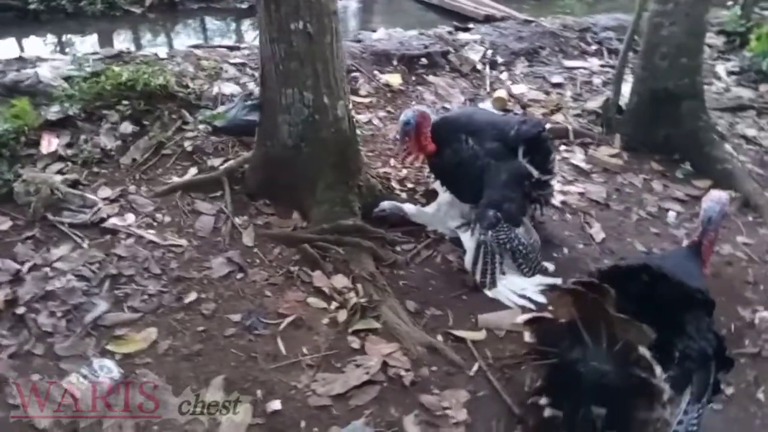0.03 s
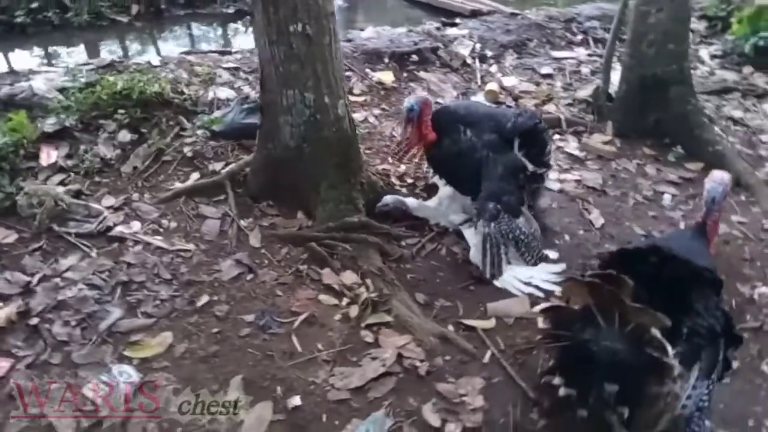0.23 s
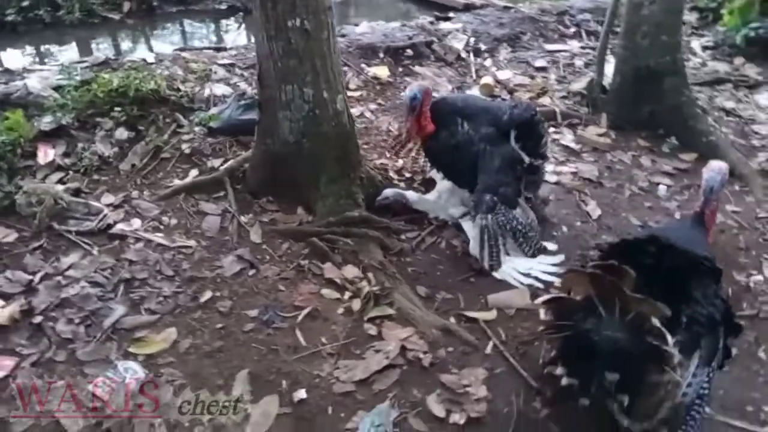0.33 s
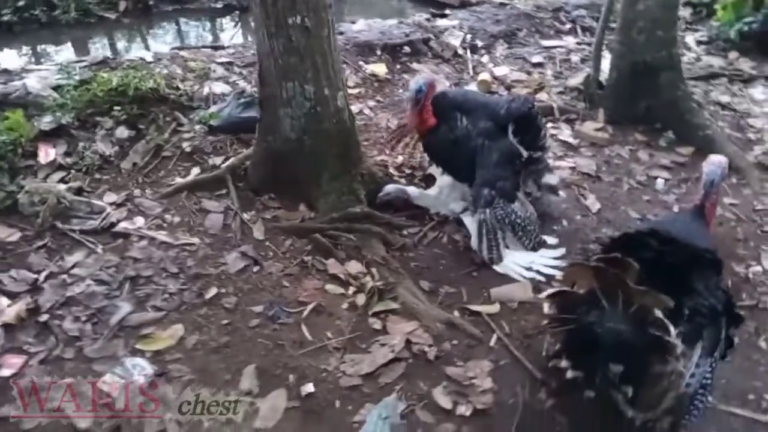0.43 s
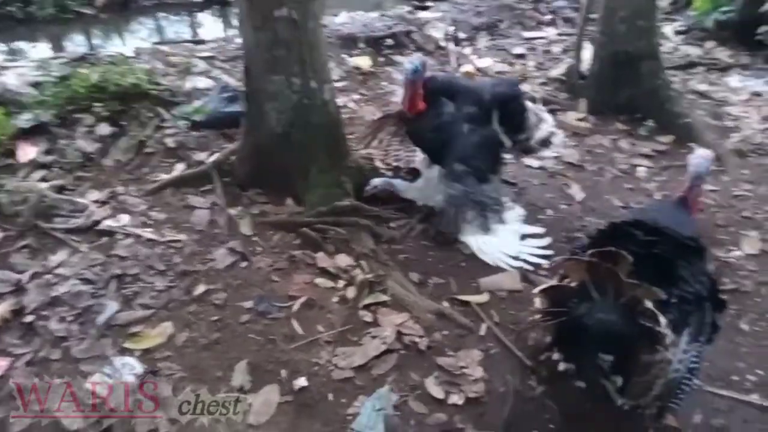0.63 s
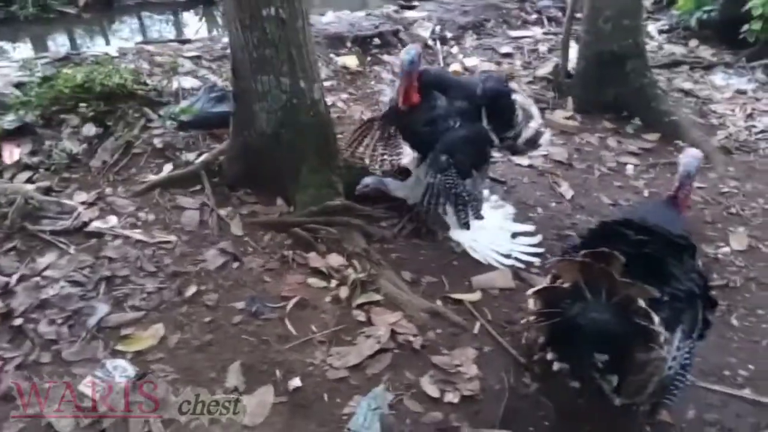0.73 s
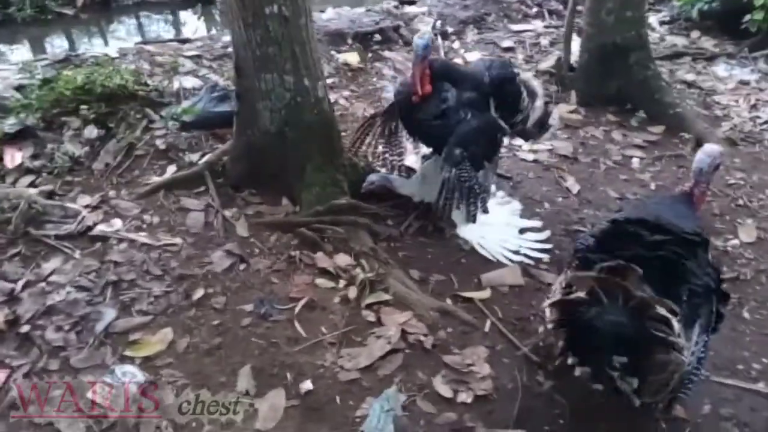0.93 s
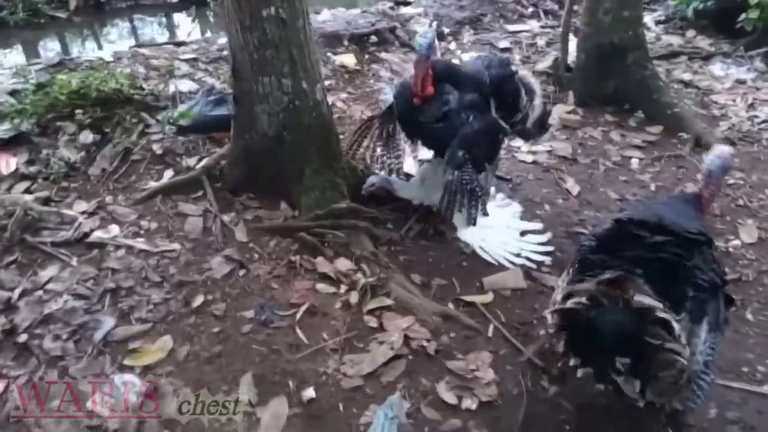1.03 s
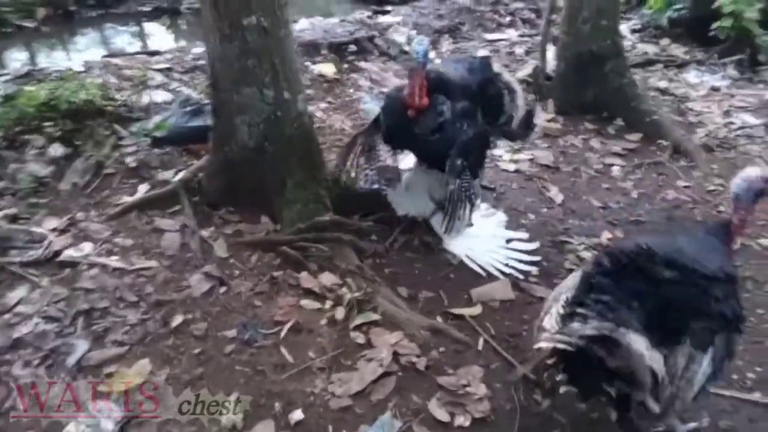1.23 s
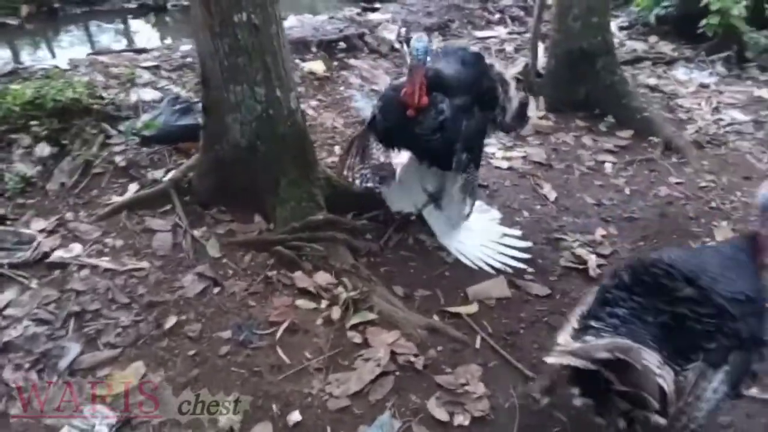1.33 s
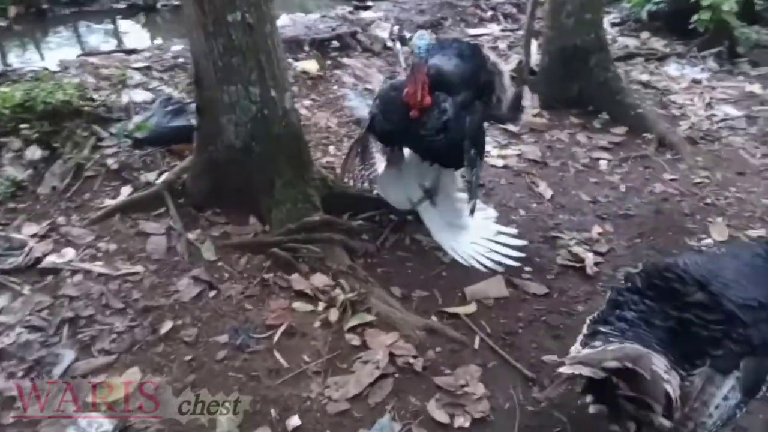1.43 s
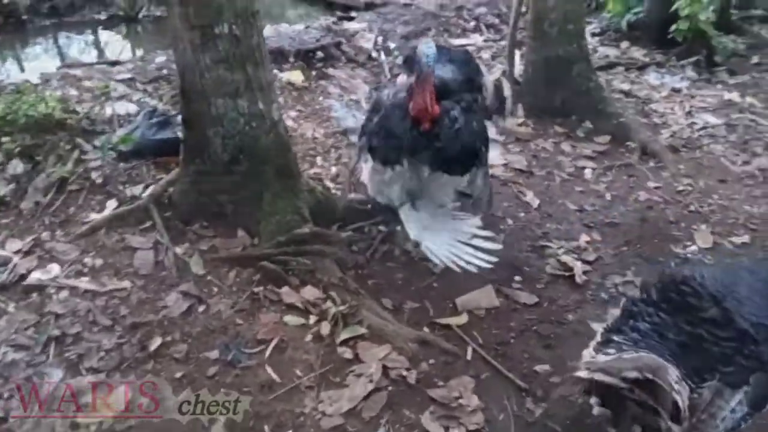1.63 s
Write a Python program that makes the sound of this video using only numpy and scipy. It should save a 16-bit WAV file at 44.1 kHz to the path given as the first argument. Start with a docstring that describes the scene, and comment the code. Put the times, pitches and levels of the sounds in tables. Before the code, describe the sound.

A turkey yelps three times, each a high thin whistle cracking down into a loud chirp outdoors

```python
"""A turkey yelps three times among trees: a sine whistle holds high, then drops into a loud chirp.
In the first two yelps it first shoots up. Overtones and air noise pass through throat resonances.
The other side of the syrinx adds a lower, rough tone, and the two combine into sum and difference tones.
Decaying noise gives the echoes. Wavering sines make far birds and coos; filtered noise, leaves and hiss."""
import sys
import numpy as np
from scipy import signal
from scipy.fft import rfft, irfft
from scipy.io import wavfile

SR = 44100
rng = np.random.default_rng(int(sys.argv[2]) if len(sys.argv) > 2 else 0)


def decibels_to_gain(level_db):
    """Convert a level in decibels to a linear amplitude gain (20 dB per decade)."""
    exponent = np.asarray(level_db, float) / 20
    return 10 ** exponent


def generate_wav(signal):
    """Clip the signal to [-1, 1] and save it as 16-bit WAV at the path in sys.argv[1]."""
    frames = np.transpose(np.atleast_2d(signal))
    scaled = np.clip(frames, -1, 1) * 32767
    pcm = np.round(scaled).astype(np.int16)
    wavfile.write(sys.argv[1], SR, pcm)


N = 74970  # samples


def rms_one(x):
    """Normalisation: scale a signal to unit rms."""
    return x / np.sqrt(np.mean(x ** 2) + 1e-20)


def at_hz(points, hz):
    """Spectral envelope: interpolate levels on a log-frequency axis."""
    point_hz, point_db = np.transpose(points)
    return np.interp(np.log(np.maximum(hz, 1)), np.log(point_hz), point_db)


def drift(rate_hz):
    """Random modulation: two-pole low-passed noise of unit rms."""
    r = np.exp(-2 * np.pi * rate_hz / SR)
    noise = rng.standard_normal(N + SR)
    return rms_one(signal.lfilter([1], [1, -2 * r, r * r], noise)[SR:])  # first second lets it settle


def coloured(spectrum):
    """Spectral shaping: white noise weighted in frequency, unit rms."""
    weights = decibels_to_gain(at_hz(spectrum, np.arange(N // 2 + 1) * SR / N))
    return rms_one(irfft(rfft(rng.standard_normal(N)) * weights, N))


def hump(start, length):
    """Amplitude envelope: half a sine cycle, zero outside it."""
    return np.sin(np.pi * np.clip((np.arange(N) / SR - start) / length, 0, 1))


def low_pass(x, hz, order):
    """Maximally flat (Butterworth) low-pass filtering."""
    return signal.sosfilt(signal.butter(order, hz, fs=SR, output="sos"), x)


def band_pass(x, band_hz, order):
    """Maximally flat (Butterworth) band-pass filtering."""
    return signal.sosfilt(signal.butter(order, band_hz, "band", fs=SR, output="sos"), x)


# Spectrum of the background hiss: [f/Hz, relative level per Hz/dB]
HISS_SPECTRUM = [(25, -25.5), (45, -18.5), (68, -4.5), (125, -6), (190, -10.5), (400, -12), (700, -18.5),
                 (1800, -15.5), (2600, -9.5), (4000, -18.5), (7200, -6), (7800, -11.5), (8800, -26.5),
                 (10000, -10), (12300, -36.5), (15200, -29.5), (16000, -41)]


def hiss():
    """Stationary noise: a steady shaped spectrum whose bass alone fluctuates strongly, in lumps."""
    level_db = -65.5  # rms before the fluctuations
    noise = coloured(HISS_SPECTRUM)
    bass = low_pass(noise, 110, order=2)
    steady = (noise - bass) * decibels_to_gain(.7 * drift(5))
    lumpy = bass * decibels_to_gain(4.5 * drift(6))
    return decibels_to_gain(level_db) * (steady + lumpy)


# Far birds and low coos: [start t/s, length/s, f/Hz, level at the peak before blurring/dB]
FAR_CALLS = [(0.02, .15, 880, -76), (.51, .1, 4220, -62), (.82, .23, 4230, -70), (.87, .16, 880, -74),
             (.96, .2, 720, -75), (1.3, .32, 900, -78), (1.587, .022, 1660, -62), (1.67, .06, 1100, -69),
             (.84, .28, 250, -78), (1.265, .045, 420, -72)]


def far_birds():
    """Frequency modulation: faint wavering sines, their amplitude blurred by distance."""
    blur = 1 + .5 * drift(40)
    waver_hz = 18 * drift(42)
    calls = 0
    for start, length, hz, db in FAR_CALLS:
        tone = np.sin(2 * np.pi * np.cumsum(hz + waver_hz) / SR)
        calls = calls + decibels_to_gain(db) * np.sqrt(2 * hump(start, length)) * tone
    return calls * blur


def track(rows):
    """Glide: pitch interpolated geometrically and sine amplitude in dB, silent outside the table."""
    s, hz, db = np.transpose(rows)
    t = np.arange(N) / SR
    edge = np.clip(np.minimum(t - s[0], s[-1] - t) / .003, 0, 1)  # 3 ms fades
    return np.exp(np.interp(t, s, np.log(hz))), decibels_to_gain(np.interp(t, s, db)) * edge * np.sqrt(2)


def resonate(x, throat):
    """Parallel resonance: alternating signs leave dark gaps between steep, twice-applied peaks."""
    out = 0
    for k, (hz, width_hz, db) in enumerate(throat):
        r = np.exp(-np.pi * width_hz / SR)
        section = [(1 - r * r) / 2, 0, (r * r - 1) / 2, 1, -2 * r * np.cos(2 * np.pi * hz / SR), r * r]
        out = out + (-1) ** k * decibels_to_gain(db) * signal.sosfilt([section, section], x)
    return out


def whistle_source(rows):
    """Harmonic series: a whistle whose overtones strengthen with effort; returns sound, phase, gain."""
    hz, gain = track(rows)
    # cycles grow uneven as the drop falls below 2600 Hz, fully so below 1300 Hz
    rasp = np.clip(2 - 2 * hz / 2600, 0, 1)
    hz = hz * (1 + .0025 * drift(42) + .07 * rasp * drift(600))
    phase = 2 * np.pi * np.cumsum(hz) / SR
    effort_db = 20 * np.log10(gain + 1e-9) + 25  # amplitude above -25 dB
    gain = gain * decibels_to_gain(1.3 * drift(120))
    gain = gain * decibels_to_gain(3.5 * rasp * drift(160))
    # the first whistle throbs as it sags
    start, length, throb_hz, depth = 0.28, 0.12, 108, .9
    throb = np.sin(np.pi * throb_hz * (np.arange(N) / SR - start)) ** 2
    gain = gain * (1 - depth * np.sqrt(hump(start, length)) * throb)
    overtones = 0
    for k in range(2, 16):
        fall = decibels_to_gain(-11 * np.log2(k / 2))  # -11 dB per doubling of the multiple
        overtones = overtones + np.sin(k * phase + k * k) * fall * (k * hz < .45 * SR)
    rich_db = -9 - hz / 1000 + .31 * effort_db  # high whistles are purer
    overtones = overtones * decibels_to_gain(rich_db) * (1 + .55 * drift(220))
    return gain * (np.sin(phase) + overtones), phase, gain


def low_source(low_hz, low_gain):
    """Beating: a second partial about 110 Hz above and random modulation roughen the lower tone."""
    beat_depth, rough_depth, rough_hz = .55, .45, 80
    low_phase = 2 * np.pi * np.cumsum(low_hz * (1 + .01 * drift(18))) / SR
    beat_hz = 110 * (1 + .3 * drift(15))
    beat = beat_depth * np.exp(2j * np.pi * np.cumsum(beat_hz) / SR)
    wobble = 1 + beat + rough_depth * (drift(rough_hz) + 1j * drift(rough_hz))
    wobble = wobble / np.sqrt(1 + beat_depth ** 2 + 2 * rough_depth ** 2)  # unit mean power
    return low_gain * wobble * np.exp(1j * low_phase)


def yelp(whistle_rows, low_rows, throat, sum_db, difference_db, low_breath_db):
    """Source, filter and heterodyning: two voices, throat-filtered air and their combination tones."""
    whistle, phase, gain = whistle_source(whistle_rows)
    low_hz, low_gain = track(low_rows)
    white = rng.standard_normal(N)
    air = decibels_to_gain(-31) * gain * white  # dB relative to the whistle's amplitude
    air = air + decibels_to_gain(low_breath_db) * low_gain * low_pass(white, 3200, order=4)
    low = low_source(low_hz, low_gain)
    low_voice = band_pass(low.imag, [1250, 2500], order=3)  # the lower tone's own resonance
    # combination tones follow the weaker of the two voices
    carrier = np.exp(1j * phase) * np.minimum(gain / (low_gain + 1e-9), 1)
    sum_tone = decibels_to_gain(sum_db) * carrier * low
    difference_tone = decibels_to_gain(difference_db) * carrier * np.conj(low)
    return resonate(whistle + air, throat) + low_voice + np.imag(sum_tone + difference_tone)


# Whistle of each yelp, before fluctuations and throat: [t/s, f/Hz, effort level/dB]
WHISTLE_TRACKS = [
    [(.207, 3560, -56.5), (.213, 3700, -42.5), (.215, 3740, -47), (.2158, 4250, -47), (.224, 4450, -33.5),
     (.229, 4780, -38), (.255, 4948, -34), (.316, 4878, -32.5), (.33, 4787, -37), (.362, 4465, -27.5),
     (.372, 4148, -37), (.383, 3680, -23.5), (.39, 3050, -32.5), (.394, 2592, -22), (.3965, 2195, -25.5),
     (.399, 1611, -20.5), (.403, 1350, -19), (.408, 1045, -22), (.411, 810, -33), (.416, 594, -51)],
    [(.654, 2908, -41), (.661, 3050, -48.5), (.662, 3550, -34), (.67, 3747, -40.5), (.671, 4250, -39.5),
     (.685, 4700, -36.5), (.72, 4799, -38), (.763, 4700, -36), (.774, 4447, -27), (.781, 4146, -33.5),
     (.786, 3050, -37), (.79, 2239, -27), (.792, 1850, -27.5), (.7955, 1425, -23.5), (.8015, 1079, -21),
     (.8035, 1001, -23), (.81, 712.5, -23.5), (.815, 500, -25), (.828, 267.6, -44.5)],
    [(1.226, 4350, -62), (1.246, 4600, -44), (1.262, 4530, -45.5), (1.271, 4512, -59), (1.296, 4424, -52),
     (1.318, 4400, -77), (1.328, 4020, -74), (1.344, 3970, -43), (1.362, 3920, -26.5), (1.372, 3850, -41.5),
     (1.378, 3573, -34), (1.381, 3158, -31), (1.389, 2912, -27), (1.3915, 2735, -38.5), (1.395, 2612, -26),
     (1.397, 2460, -46), (1.3995, 2230, -28.5), (1.406, 1657, -25), (1.41, 1400, -24), (1.412, 945, -37),
     (1.415, 890, -19.5), (1.424, 819, -25.5), (1.432, 779, -60)],
]
# Lower tone of each yelp, before its roughness and resonance; the first yelp's rows begin with a short loud
# tick near 0.19 s: [t/s, f/Hz, level/dB]
LOW_TRACKS = [
    [(.185, 1227, -57.5), (.194, 1510, -36), (.2, 1553, -57), (.224, 1527, -55), (.232, 1650, -34),
     (.245, 1646, -36), (.278, 1675, -36), (.3, 1830, -38.5), (.315, 1621, -37), (.362, 1722, -44.5),
     (.385, 1850, -43)],
    [(.641, 1280, -60), (.648, 1404, -44.5), (.654, 1458, -71), (.676, 1548, -51.5), (.69, 1593, -45),
     (.746, 1644, -41.5), (.762, 1620, -43), (.775, 1590, -56.5), (.788, 1610, -61.5)],
    [(1.226, 1871, -66), (1.25, 1659, -55.5), (1.284, 1532, -53), (1.294, 1704, -47), (1.32, 1615, -50.5),
     (1.334, 1802, -44.5), (1.356, 1930, -54.5), (1.372, 1867, -52.5), (1.385, 1870, -64)],
]
# Throat and beak resonances, first two yelps: [f/Hz, width of a single pass/Hz, level/dB]
THROAT_AHEAD = [(390, 520, -20), (1026, 840, -6.5), (1350, 780, -2.5), (1850, 690, 3), (3132, 300, -0.5),
                (3680, 200, -8.5), (4840, 797, 5.5), (6195, 180, 0.5), (7225, 430, -2), (10400, 1300, -15)]
# The same in the third yelp, head turned: [f/Hz, width of a single pass/Hz, level/dB]
THROAT_ASIDE = [(770, 264, -30.5), (1610, 590, -11.5), (2324, 470, 1.5), (2635, 410, -14.5),
                (3050, 360, -5.5), (3982, 310, -11), (4600, 510, 0), (6656, 324, 6.5)]
# Sum tone (whistle plus lower tone), one value per yelp: [level factor/dB]
SUM_TONE_DB = [-20, -21.5, -24.5]
# Difference tone (whistle minus lower tone), one value per yelp: [level factor/dB]
DIFFERENCE_TONE_DB = [-31, -15.5, -8.5]
# Air noise beside the lower tone before filtering, one value per yelp: [level re its amplitude/dB]
LOW_AIR_DB = [-26, -24, -3]


def turkey_yelps():
    """Superposition: the three yelps, each with its own tracks, throat and levels."""
    throats = [THROAT_AHEAD, THROAT_AHEAD, THROAT_ASIDE]
    parts = zip(WHISTLE_TRACKS, LOW_TRACKS, throats, SUM_TONE_DB, DIFFERENCE_TONE_DB, LOW_AIR_DB)
    return sum(yelp(*part) for part in parts)


# Echoes among the trees: [band centre f/Hz, 60 dB decay time/s, band weight/dB]
WOOD_BANDS = [(500, 0.14, -7.5), (1111, 0.078, -24.5), (1964, 0.3, -21), (2563, 0.4, -8),
              (3160, 0.29, -8.5), (4800, 0.3, -11.5), (6960, 0.092, -5)]


def woods(x):
    """Multiple scattering: convolution with noise that decays exponentially, band by band."""
    delay_s, rise_s = 0.0041, 0.0027
    t = np.arange(SR // 2) / SR
    centres = [row[0] for row in WOOD_BANDS]
    edges = np.sqrt(np.multiply([150] + centres, centres + [14000]))  # geometric means of neighbours
    tail = 0
    for (hz, t60, db), low, high in zip(WOOD_BANDS, edges, edges[1:]):
        band = band_pass(rng.standard_normal(len(t)), [low, high], order=2)
        decay = decibels_to_gain(-60 * t / t60)
        tail = tail + decibels_to_gain(db) * band * decay / np.sqrt(np.sum(decay ** 2))
    onset = np.clip((t - delay_s) / rise_s, 0, 1)
    return signal.fftconvolve(x, tail * onset)[:N]


# Rustles of dry leaves: [centre t/s, length/s, level at the peak before flutter/dB]
LEAF_BRUSHES = [(0.636, 0.087, -58.5), (1.05, 0.0056, -59.5), (1.084, 0.02, -64), (1.575, 0.08, -93)]
# Spectrum of the leaves: [f/Hz, relative level per Hz/dB]
LEAF_SPECTRUM = [(4500, -29), (7400, 2.5), (8500, -24.5), (10100, -10), (12000, -24.5), (14600, -14),
                 (15800, -21)]


def rustle():
    """Friction noise: short bright brushes of dry leaves as enveloped, fluttering noise."""
    noise = coloured(LEAF_SPECTRUM) * decibels_to_gain(2 * drift(110))
    return noise * sum(decibels_to_gain(db) * hump(s - length / 2, length) ** 2 for s, length, db in LEAF_BRUSHES)


def scene():
    """Superposition: the turkey and its echoes over the background, in one channel."""
    background = hiss() + far_birds()
    turkey = turkey_yelps()
    return (background + turkey + woods(turkey) + rustle())[None]


def roll_off(x):
    """The treble ends steeply here."""
    return signal.sosfilt(signal.butter(12, 15660, fs=SR, output="sos"), x)


def record(dry):
    """Signal chain: the finished mix passes to its last stage."""
    return roll_off(dry)


dry = scene()
out = record(dry)
generate_wav(out)
```